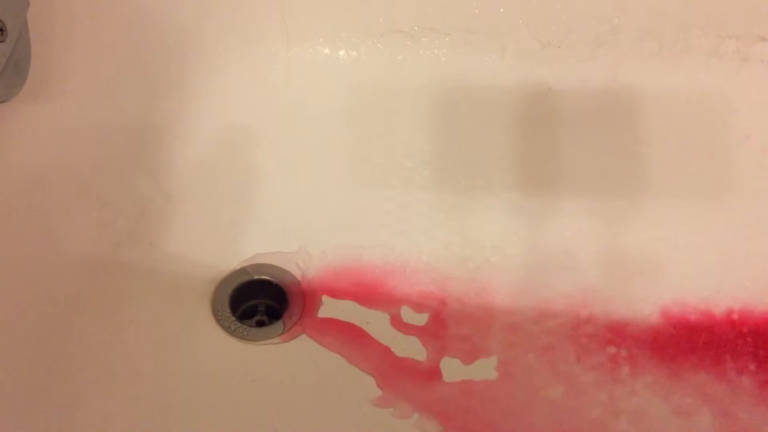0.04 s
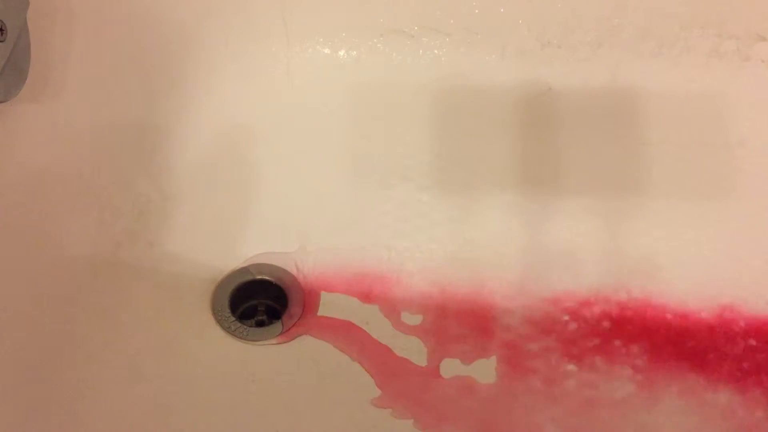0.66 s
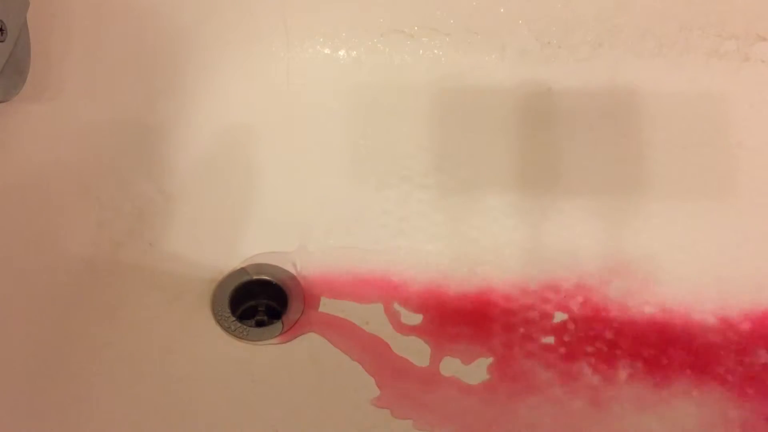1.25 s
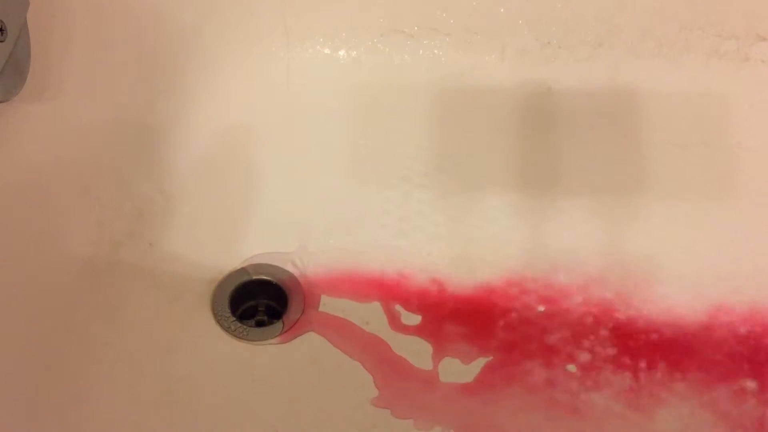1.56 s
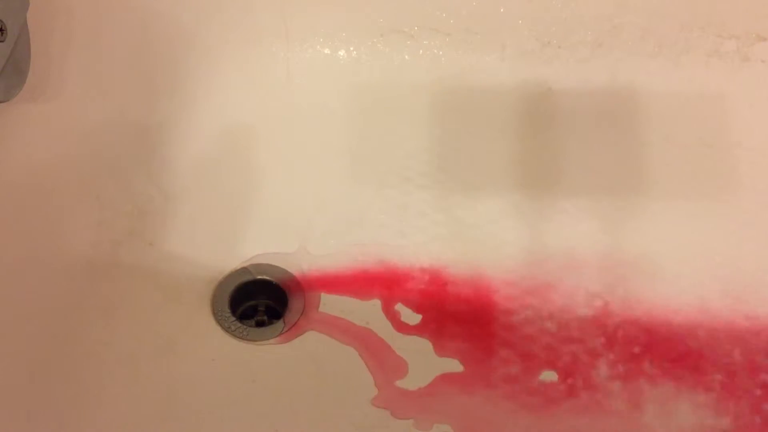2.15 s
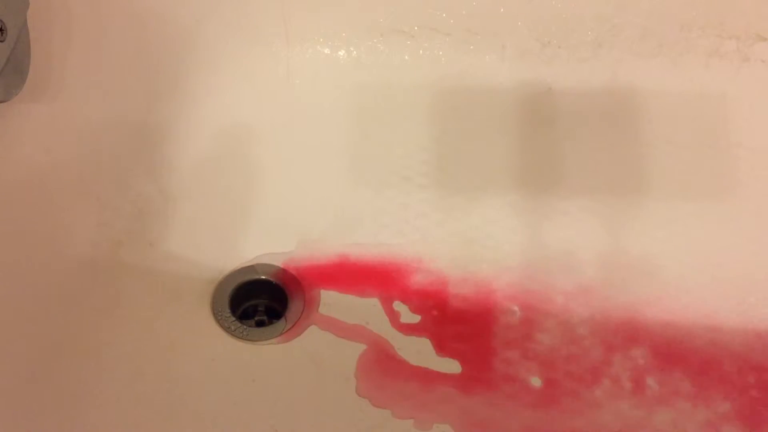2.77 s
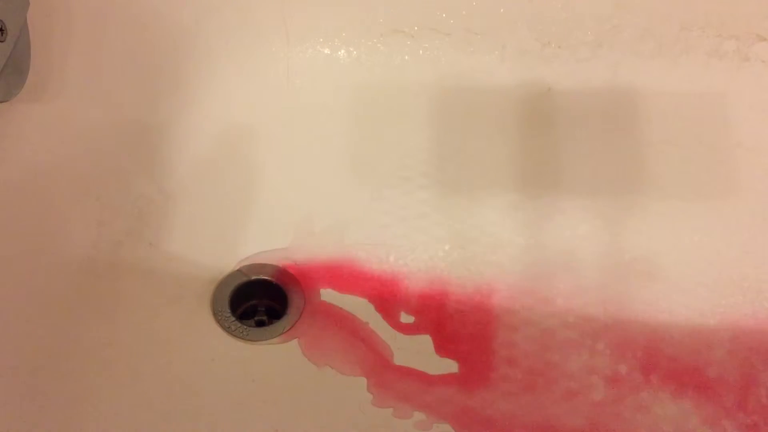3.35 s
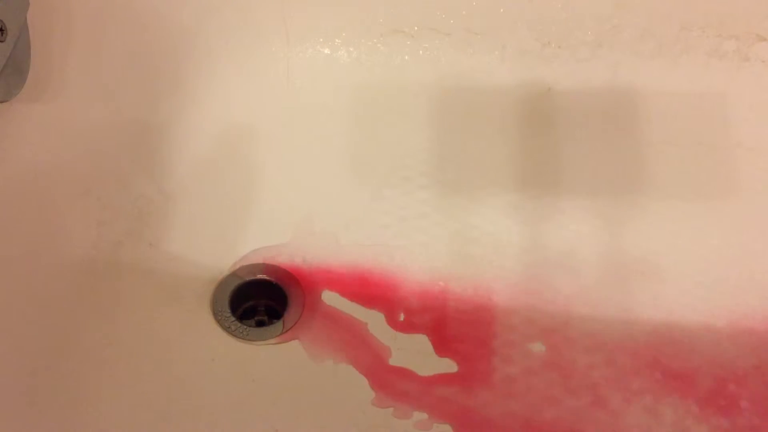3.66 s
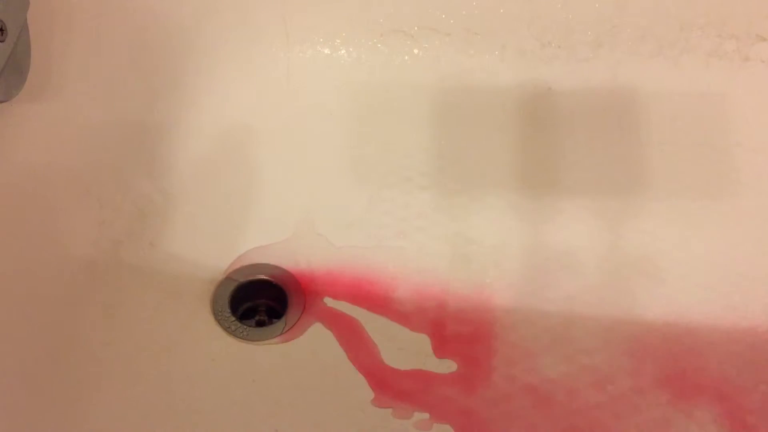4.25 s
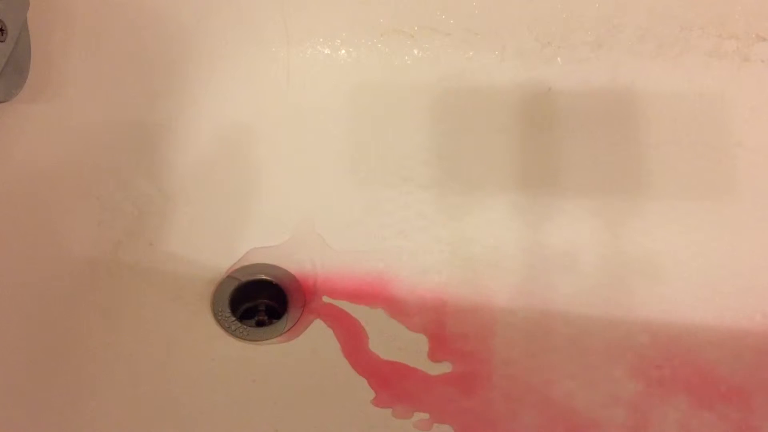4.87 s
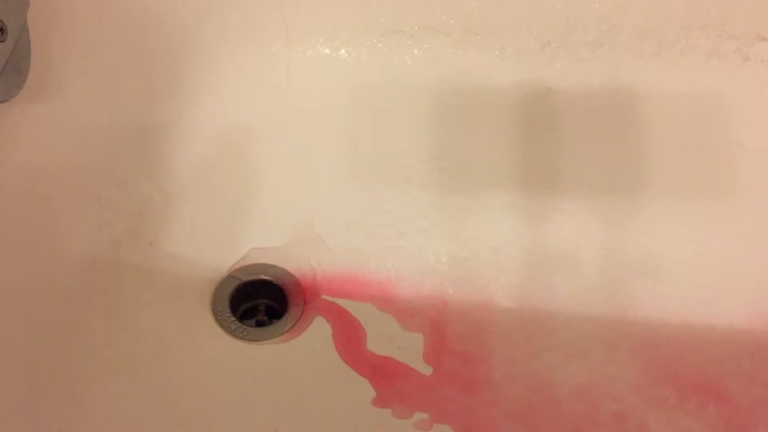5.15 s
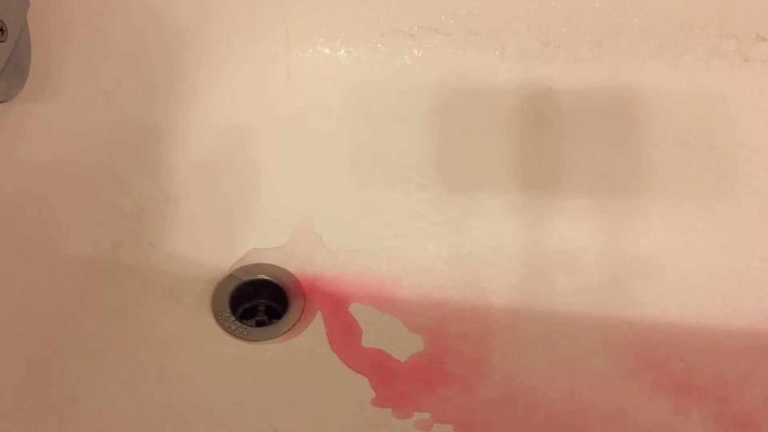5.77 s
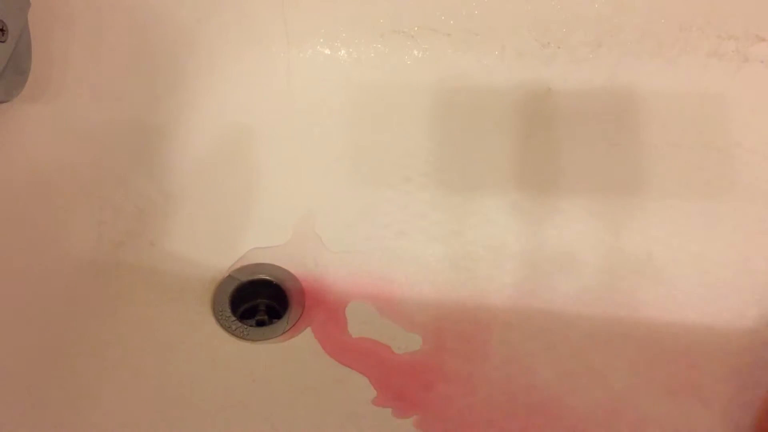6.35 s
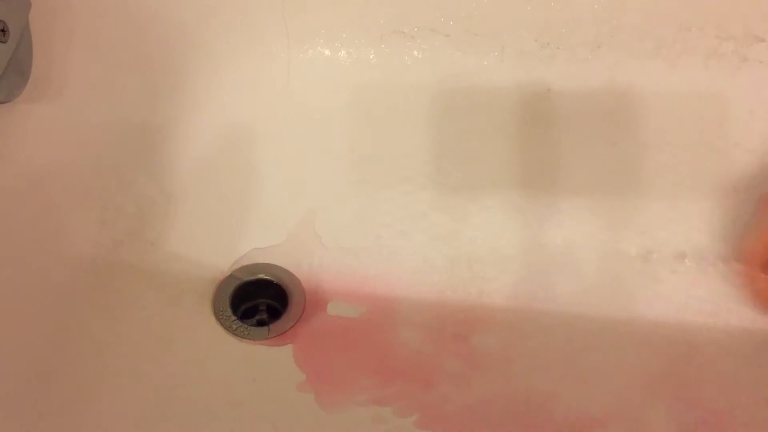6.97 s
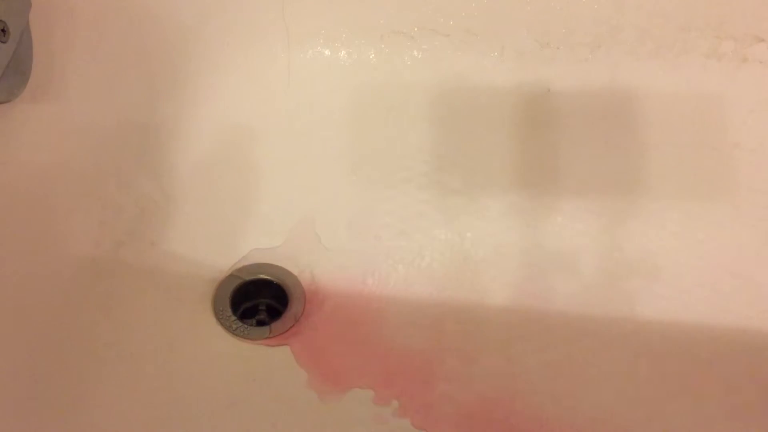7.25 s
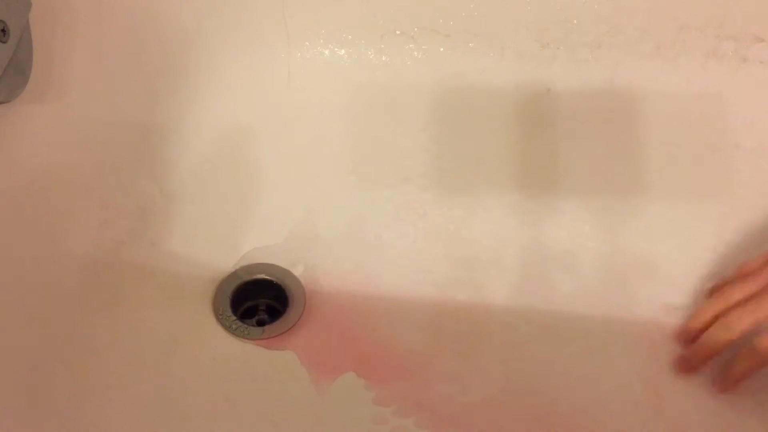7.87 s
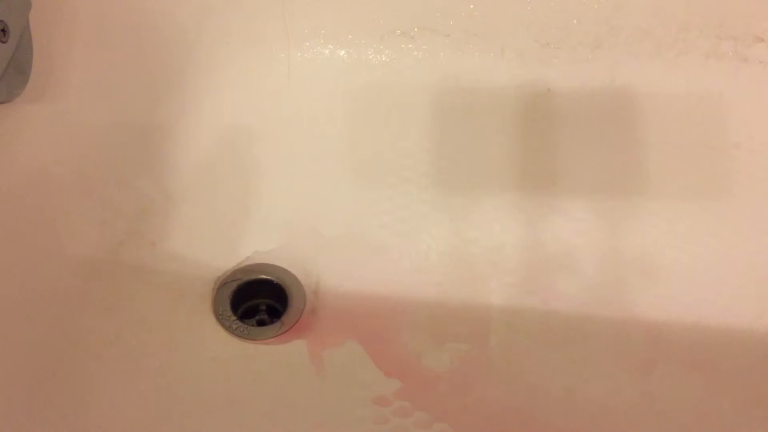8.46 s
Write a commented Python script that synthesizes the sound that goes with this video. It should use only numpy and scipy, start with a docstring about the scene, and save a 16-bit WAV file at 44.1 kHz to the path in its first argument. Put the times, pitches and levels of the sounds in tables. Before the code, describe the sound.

Water sprays and trickles down a bathtub drain while an extractor fan hums, with brief splashes and gurgles later on.

```python
"""A shower sprays steadily into a bathtub, its nozzle hissing with thin whistles of fixed pitch.
Drops tick on the enamel and trap small bubbles that plink as the water runs off to the drain.
In the second half the water is stirred into one faint and two sharp splashes and a few low gurgles.
Tub and tiles echo the water, and an extractor fan hums behind it all. The sound is mono."""
import sys
import numpy as np
from scipy import signal
from scipy.fft import rfft, irfft
from scipy.io import wavfile
from scipy.ndimage import uniform_filter1d

SR = 44100
rng = np.random.default_rng(int(sys.argv[2]) if len(sys.argv) > 2 else 0)


def digitize_waveform(pressure):
    """Quantize a signal to 16-bit integers and store it at the path in sys.argv[1].

    Rows of a 2-D input are taken as channels; values are limited to [-1, 1].
    """
    field = np.atleast_2d(pressure).T
    bounded = np.clip(field, -1, 1)
    quanta = np.round(bounded * 32767).astype(np.int16)
    wavfile.write(sys.argv[1], SR, quanta)


N = 384552
TIME = np.arange(N) / SR
FREQ = np.maximum(np.arange(N // 2 + 1) * SR / N, 1)

# Splashes of stirred water. Each row: loudest moment in seconds, level in dB, middle pitch in Hz.
SPLASH_EVENTS = [(5.886, -43, 5000), (6.908, -34, 5300), (7.454, -37.5, 6900)]


def spray(flutter_db=0.87, flow_db=0.5):
    """Countless tiny impacts and the whistling jets merge into a hiss that wavers with the flow."""
    # The tone of the hiss. Each row: frequency in Hz, level in dB per Hz.
    hiss_tone = [(200, -103), (850, -87.5), (1200, -82.5), (1650, -84.5), (2100, -83.5), (2650, -79),
                 (3300, -85.5), (4700, -88.5), (5600, -80.5), (7700, -87), (9400, -79), (10450, -85.5),
                 (11400, -85), (16000, -89.5)]
    # Whistles of the nozzle. Each row: pitch in Hz, width in Hz, boost over the hiss in dB.
    whistles = [(1135, 70, 5), (1240, 60, 3.5), (1385, 60, 4.5), (1776, 24, 11.5), (1835, 75, 9),
                (2015, 40, 4.5), (2165, 60, 8), (2340, 40, 5), (2398, 34, 7), (2560, 30, 3.5),
                (2626, 32, 6.5), (2810, 32, 7.5), (3440, 70, 3.5), (5300, 85, 7.5), (5725, 30, 4.5),
                (6285, 30, 5.5), (6780, 60, 7), (8550, 250, 2.5), (9417, 32, 5.5), (9529, 75, 8),
                (9641, 32, 6), (9895, 40, 7.5), (9961, 42, 10), (10070, 50, 6), (11120, 90, 7.5),
                (11570, 70, 6.5)]
    grains = unit(impacts(rate=9000, spread_db=3.0) + rng.standard_normal(N))
    hiss = colour(grains, hiss_tone, whistles)
    return hiss * undb(flutter_db * drift(18) + flow_db * drift(2.23))


def patter(rate=240, db=-41.5, spread_db=4.0, shape_count=300):
    """Fine droplets of the spray crackle on the wet tub: many faint, a few strong."""
    out = np.zeros(N)
    cracks = [crack(hz=14000, decay_s=0.00067, octaves=0.28) for _ in range(shape_count)]
    for when, force, shape in rng.random((int(rate * N / SR), 3)):
        gain = undb(db - spread_db * np.log(0.027 + force))
        add(out, when * N / SR, gain * cracks[int(shape * shape_count)])
    return out


def ticks(boost_db=1.0):
    """A drop hits the bare enamel with a tiny, high crack."""
    # Sharp drops. Each row: start in seconds, level in dB.
    hits = [(1.448, -23), (1.598, -22), (1.814, -23), (2.485, -16.5), (2.586, -22.5), (3.81, -24),
            (4.623, -26), (5.07, -25), (6.72, -23), (7.979, -23), (8.269, -26)]
    out = np.zeros(N)
    for s, db in hits:
        add(out, s, undb(db + boost_db) * crack(hz=13000, decay_s=0.00092, octaves=0.39))
    return out


def drips(db=-1, slap_db=-2, slap_cycles=1.8):
    """A larger drop slaps the film of water and leaves a bubble ringing."""
    # Drops that stand out. Each row: start in seconds, bubble pitch in Hz, level in dB.
    big_drops = [(0.175, 7060, -18), (0.351, 3680, -27.5), (0.801, 6100, -23), (1.425, 3660, -27.5),
                 (1.652, 5460, -28), (1.711, 3660, -28), (2.385, 2740, -26.5), (2.686, 4800, -30),
                 (2.906, 2330, -30), (3.325, 4970, -26), (4.065, 5300, -25), (4.9, 3220, -29),
                 (5.076, 2550, -26), (5.927, 5260, -22.5), (6.214, 6500, -22), (6.41, 5570, -27),
                 (7.034, 2140, -27), (7.059, 1750, -20.5), (7.16, 2480, -28), (7.505, 2580, -27),
                 (8.089, 6800, -21), (8.219, 3170, -25)]
    drops = big_drops + stray_drips()
    out = bubbles(drops, cycles=3.2, glide=0.0086)
    for s, hz, drop_db in drops:
        add(out, s, undb(drop_db + slap_db) * crack(hz, slap_cycles / hz, octaves=0.52))
    return undb(db) * out


def stray_drips(rate=4, centre_hz=4000, octaves=0.73, db=-35, range_db=4):
    """Weaker drops fall at random, harder in a surge. Gives each one's start, pitch and level."""
    when, size, force = rng.random((int(rate * N / SR), 3)).T
    s = when * N / SR
    hz = centre_hz * 2 ** (octaves * (2 * size - 1))
    level_db = db + range_db * (force - .5) + surge_db(s) / 2
    return list(zip(s, hz, level_db))


def trickle(rate=55, centre_hz=2900, octaves=0.445, db=-44.5, spread_db=3, tilt_db=2):
    """Small bubbles of many sizes form where the spray lands and the water slips into the drain."""
    when, size, force = rng.random((int(rate * N / SR), 3)).T
    s = when * N / SR
    octave = octaves * np.clip(np.arctanh(2 * size - 1), -3, 3)  # most are near the middle size
    level_db = db + surge_db(s) - spread_db * np.log(0.032 + force)
    level_db += tilt_db * octave  # shallow water keeps big, low bubbles weak
    return bubbles(zip(s, centre_hz * 2 ** octave, level_db), cycles=5, glide=0.021)


def surge_db(s):
    """How much harder the water bubbles at time s."""
    # Surges in the run-off. Each row: strongest moment in seconds, half-length in seconds, boost in dB.
    surges = [(1.77, .04, 4), (3.42, 0.1, 1), (5.13, .06, 7), (5.59, 0.037, 12), (5.97, .05, 8),
              (7.24, .07, 6.5)]
    return sum(boost * np.exp(-.5 * ((s - crest) / width) ** 2) for crest, width, boost in surges)


def splashes(fallback_lag_s=.04, fallback_db=-8.5):
    """Stirred water throws up drops that fall back a moment later, weaker and duller."""
    out = np.zeros(N)
    drops = impacts(rate=8000, spread_db=7.0)
    fallback = band(impacts(rate=3000, spread_db=3.5), hz=3050, octaves=.6) * undb(fallback_db)
    for s, db, hz in SPLASH_EVENTS:
        out += undb(db) * swell(s, rise_s=.018, fall_s=.022) * band(drops, hz, octaves=0.73)
        out += undb(db) * swell(s + fallback_lag_s, rise_s=0.028, fall_s=0.052) * fallback
    return out


def smacks(boost_db=17):
    """At the height of each splash the water smacks the tub."""
    out = np.zeros(N)
    for s, db, hz in SPLASH_EVENTS:
        add(out, s, undb(db + boost_db) * crack(hz, decay_s=0.0011, octaves=0.22))
    return out


def gurgles(slosh_s=7.05, slosh_db=-47.5, bubble_db=8):
    """Pockets of air break up, each around one big bubble; the stirred water sloshes once and settles."""
    # Pockets of trapped air. Each row: loudest moment in seconds, level in dB, middle pitch in Hz.
    pockets = [(0.56, -47, 1500), (5.77, -56, 685), (5.881, -51, 1280), (6.289, -53, 1280),
               (6.899, -48, 1310), (7.364, -46.5, 1000), (7.366, -41.5, 550), (7.388, -41.5, 427),
               (7.797, -50, 880), (8.52, -53, 1000), (8.56, -50, 1030)]
    churn = impacts(rate=8700, spread_db=6.0)
    slosh = band(churn, hz=1190, octaves=1.0)
    out = undb(slosh_db) * swell(slosh_s, rise_s=0.097, fall_s=0.24) * slosh
    for s, db, hz in pockets:
        out += undb(db) * swell(s, rise_s=.007, fall_s=0.013) * band(churn, hz, octaves=0.34)
    big_bubbles = [(s, hz, db + bubble_db) for s, db, hz in pockets]
    return out + bubbles(big_bubbles, cycles=4, glide=0.011)


def fan(waver_db=0.7):
    """The motor hums at twice the mains frequency while air rumbles in the duct."""
    # Tones of the motor. Each row: pitch in Hz, level in dB.
    motor_tones = [(120, -35.1), (138.7, -57), (360, -64.5), (600, -71)]
    # The tone of the rumbling air. Each row: frequency in Hz, level in dB per Hz.
    air_tone = [(20, -90), (42, -83), (60, -71.5), (72, -56.5), (88, -54.5), (100, -65), (130, -63),
                (175, -72), (310, -71.5), (380, -77), (600, -84), (900, -87.5), (3000, -110)]
    # Pitches at which the duct rings. Each row: pitch in Hz, width in Hz, boost over the rumble in dB.
    duct_rings = [(200, 10, 4), (226, 10, 8.5), (266, 8, 4.5), (298, 20, 10.5), (346, 8, 6)]
    hum = np.zeros(N)
    for hz, db in motor_tones:
        hum += undb(db) * np.sqrt(2) * np.sin(2 * np.pi * (hz * TIME + rng.random()))
    hum *= undb(waver_db * drift(4))
    return hum + colour(rng.standard_normal(N), air_tone, duct_rings)


def bathroom(x, tub_db, tiles_db, tub_fade_s=0.048, tiles_fade_s=0.23, gap_s=.0025):
    """Add quick echoes between the tub walls and the longer ring of the tiled room."""
    t = TIME[:SR // 2]
    echoes = np.zeros(len(t))
    for db, fade_s in ((tub_db, tub_fade_s), (tiles_db, tiles_fade_s)):
        fade = np.exp(-np.log(1000) * t / fade_s)  # 60 dB down after fade_s
        tail = rng.standard_normal(len(t)) * fade * (t > gap_s)
        echoes += undb(db) * tail / np.sqrt(np.sum(tail ** 2))
    return x + signal.fftconvolve(x, echoes)[:N]


def bubbles(rows, cycles, glide):
    """Each trapped bubble rings for a few cycles and rises in pitch as it nears the surface."""
    out = np.zeros(N)
    for s, hz, db in rows:
        age = np.arange(0, 6, hz / (cycles * SR))  # each unit of age fades the ring to about a third
        ring = np.sin(2 * np.pi * cycles * age * (1 + glide * age))
        onset = 1 - np.exp(-2 * cycles * age)
        add(out, s, undb(db) * np.exp(-age) * onset * ring)
    return out


def crack(hz, decay_s, octaves):
    """The slap of a drop: a tiny burst of noise around one pitch, with a peak of 1."""
    t = TIME[:SR // 50]
    edges_hz = np.clip([hz / 2 ** octaves, hz * 2 ** octaves], 50, .45 * SR)
    bandpass = signal.butter(3, edges_hz, "bandpass", fs=SR)
    burst = signal.lfilter(*bandpass, rng.standard_normal(len(t)) * np.exp(-t / decay_s))
    return burst / np.abs(burst).max()


def impacts(rate, spread_db):
    """Clicks at random moments, rate of them a second: many small, a few large."""
    when, force, side = rng.random((int(rate * N / SR), 3)).T
    size = undb(-spread_db * np.log(0.0032 + force)) * np.sign(side - .5)
    return unit(np.bincount((when * N).astype(int), size, N))


def colour(x, tone, rings):
    """Shape even noise to a tone curve, with ringing peaks on top."""
    tone_hz, tone_db = np.transpose(tone)
    db = np.interp(np.log(FREQ), np.log(tone_hz), tone_db)
    for centre, width, boost in rings:
        db += boost / (1 + (2 * (FREQ - centre) / width) ** 2) ** 2
    return irfft(rfft(x) * undb(db), N) * np.sqrt(SR / 2)


def band(x, hz, octaves):
    """Keep the part of a sound around one pitch, at an average level of 1."""
    bell = np.exp(-.5 * (np.log2(FREQ / hz) / octaves) ** 2)
    return unit(irfft(rfft(x) * bell, N))


def swell(s, rise_s, fall_s):
    """A loudness curve that grows to 1 at time s and dies away."""
    return np.exp(-np.maximum((s - TIME) / rise_s, (TIME - s) / fall_s))


def drift(rate):
    """A smooth random wander that heads for a new value rate times a second."""
    hold = int(SR / rate)
    steps = np.repeat(rng.standard_normal(N // hold + 1), hold)
    return unit(uniform_filter1d(steps, hold)[:N])


def add(out, s, sound):
    """Mix a short sound in at s seconds."""
    start = int(np.clip(s * SR, 0, N - 1))
    out[start:start + len(sound)] += sound[:N - start]


def undb(db):
    """Turn decibels into a volume factor."""
    return 10 ** (np.asarray(db) / 20)


def unit(x):
    """Scale to an average (rms) level of 1."""
    return x / np.sqrt(np.mean(x ** 2))


def scene():
    """Spray, drops, bubbles and splashes ring in the bathroom over the steady fan."""
    water = bathroom(trickle() + splashes() + gurgles(), tub_db=1.0, tiles_db=-1.0)
    plinks = bathroom(drips(), tub_db=-0.5, tiles_db=-2)
    drops = bathroom(ticks() + smacks() + patter(), tub_db=-4.5, tiles_db=-7.5)
    hiss = undb(-0.35) * bathroom(spray(), tub_db=-16.5, tiles_db=-9.5)
    mono = water + plinks + drops + hiss + fan()
    return np.array([mono, mono])


def record(dry):
    """A steep filter cuts off the very highest treble."""
    top_hz = 15950
    return signal.sosfilt(signal.ellip(12, .1, 80, top_hz, fs=SR, output="sos"), dry)


dry = scene()
out = record(dry)
digitize_waveform(out)
```